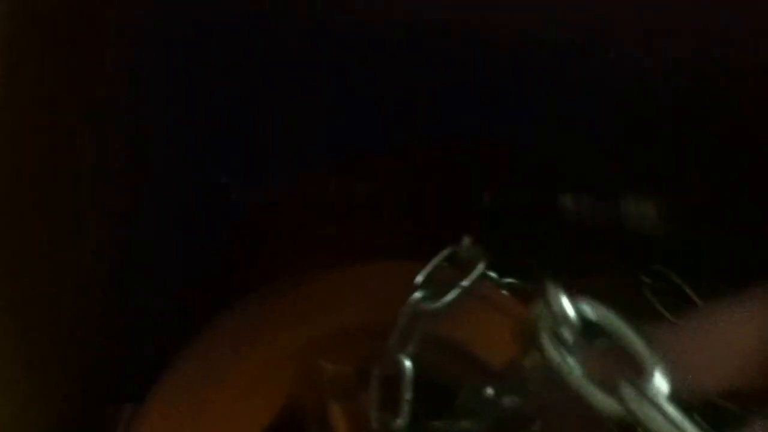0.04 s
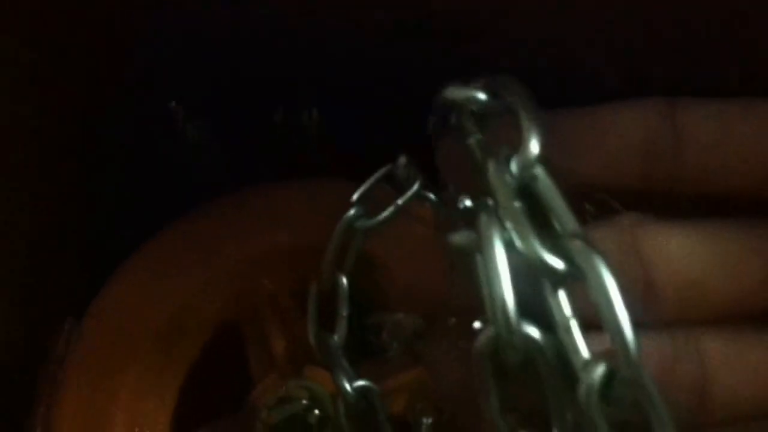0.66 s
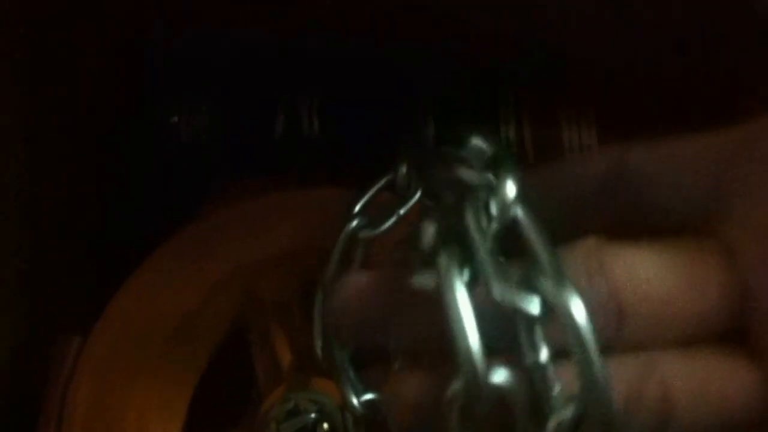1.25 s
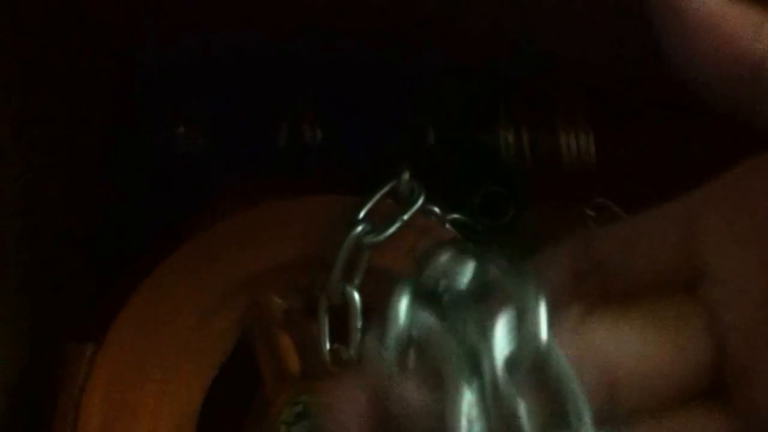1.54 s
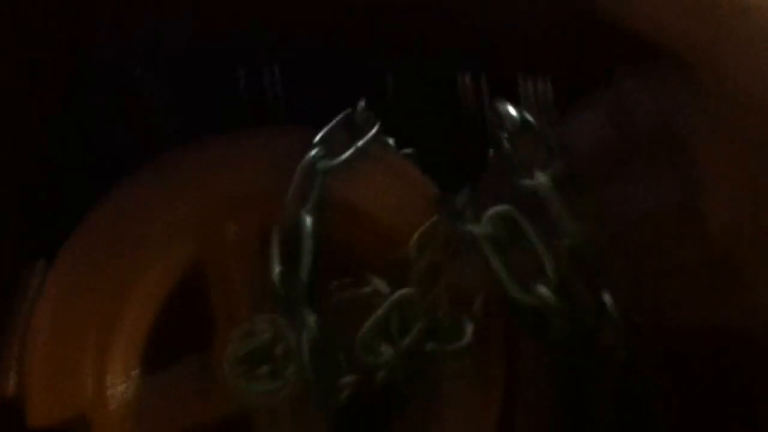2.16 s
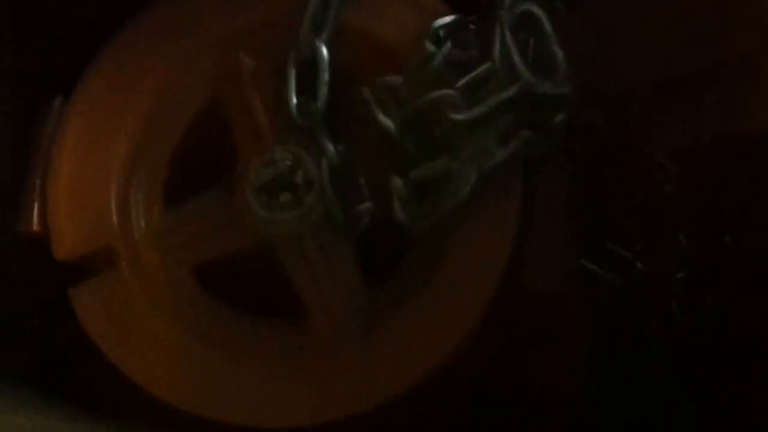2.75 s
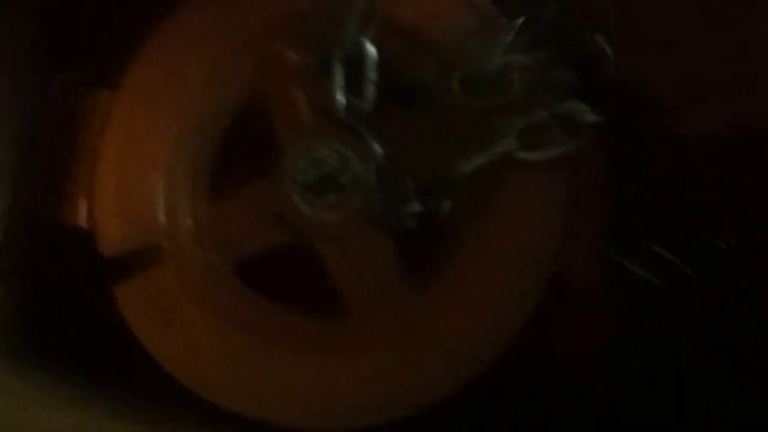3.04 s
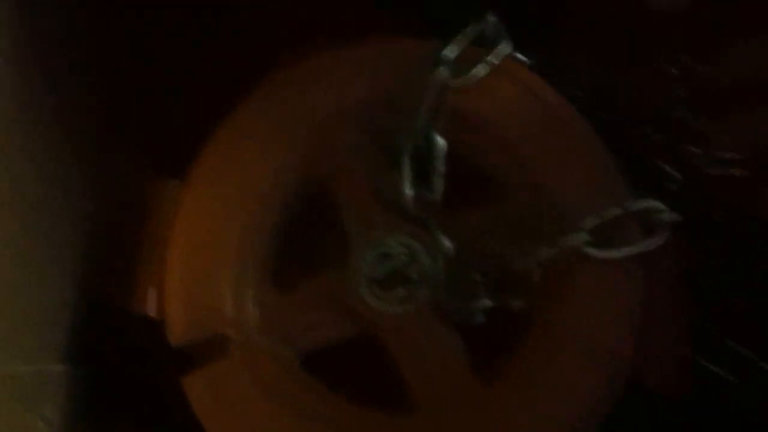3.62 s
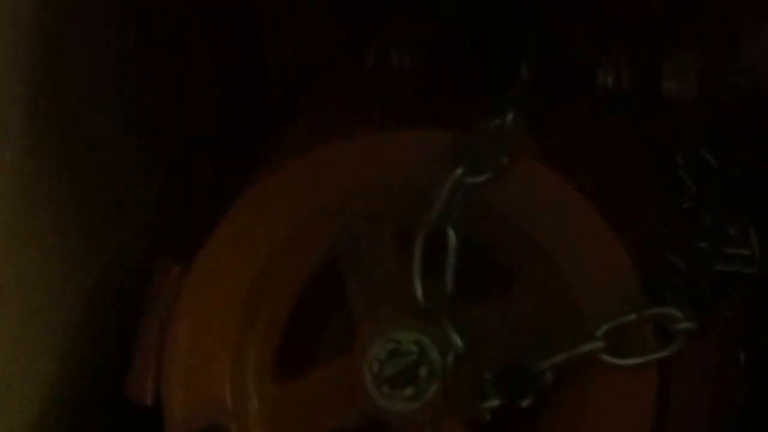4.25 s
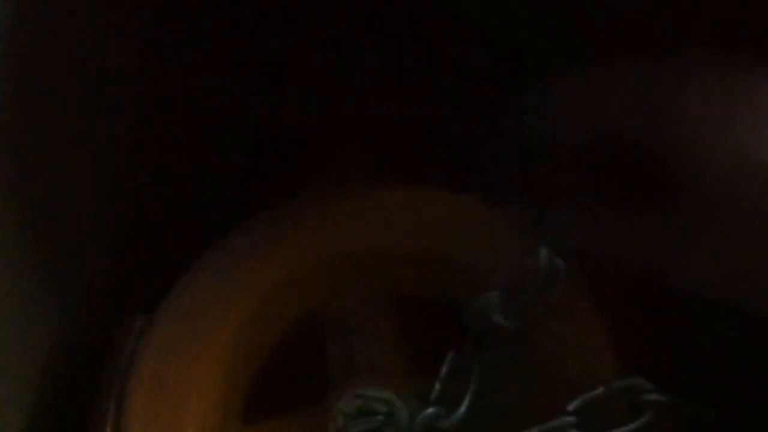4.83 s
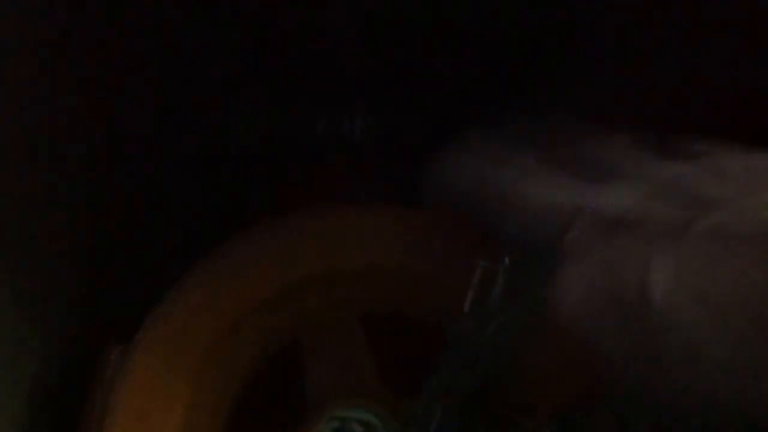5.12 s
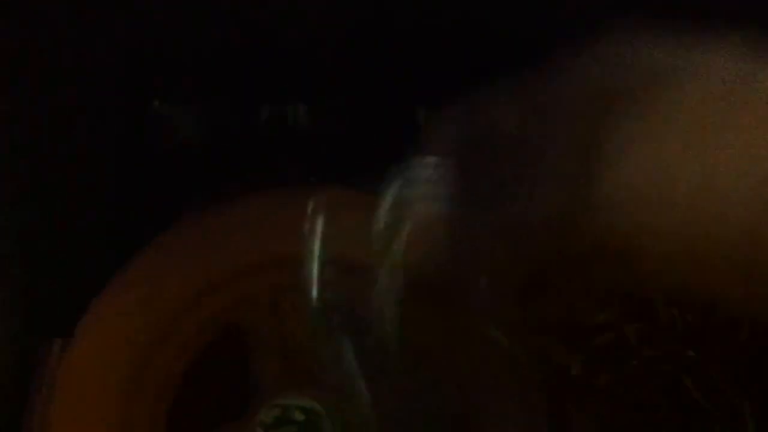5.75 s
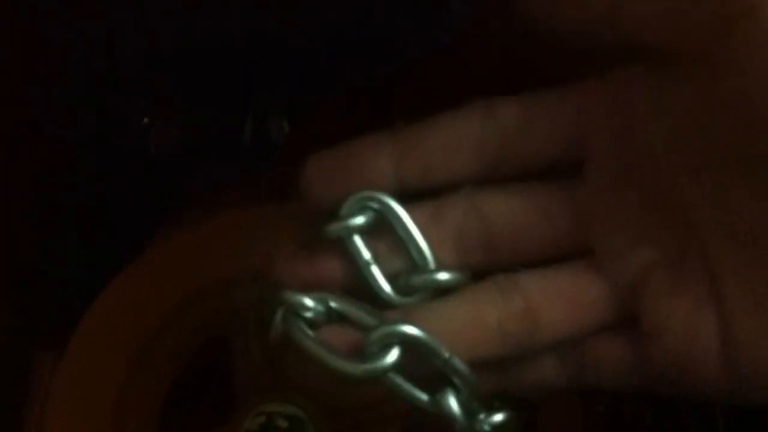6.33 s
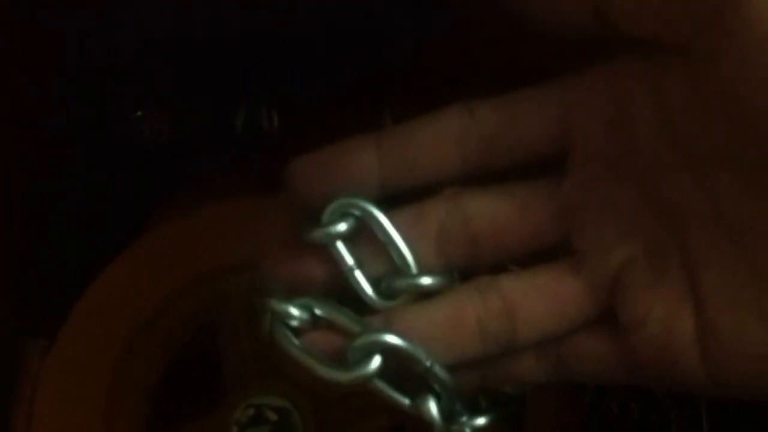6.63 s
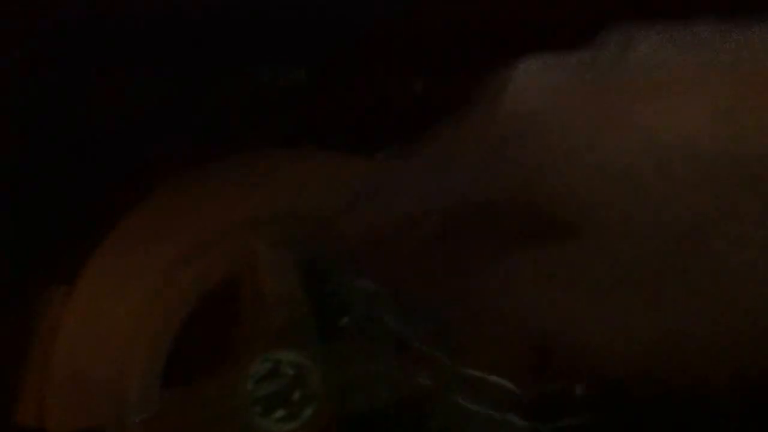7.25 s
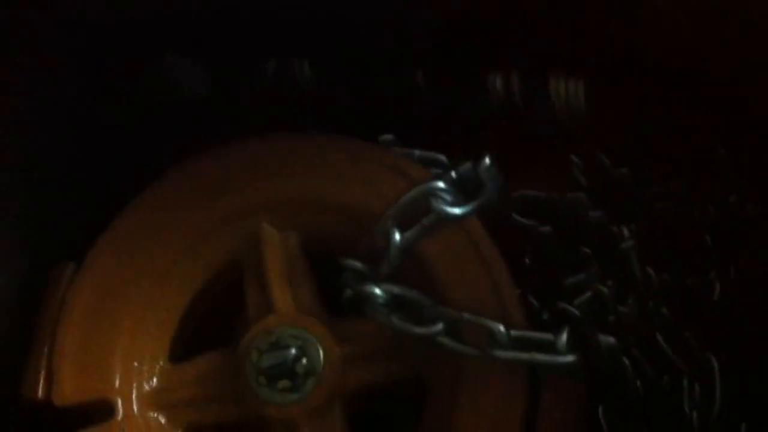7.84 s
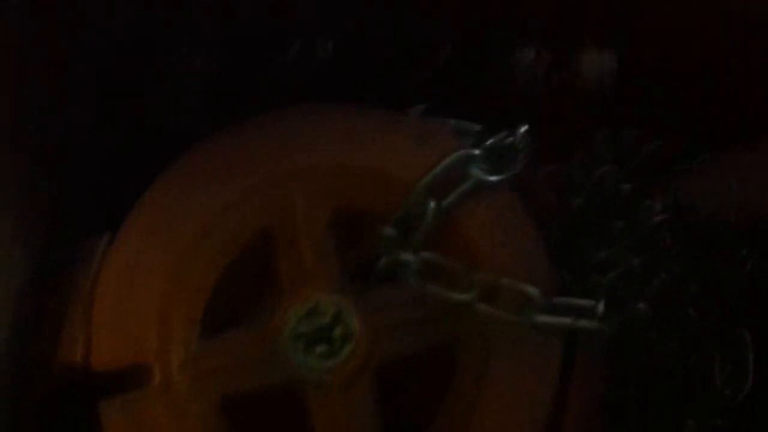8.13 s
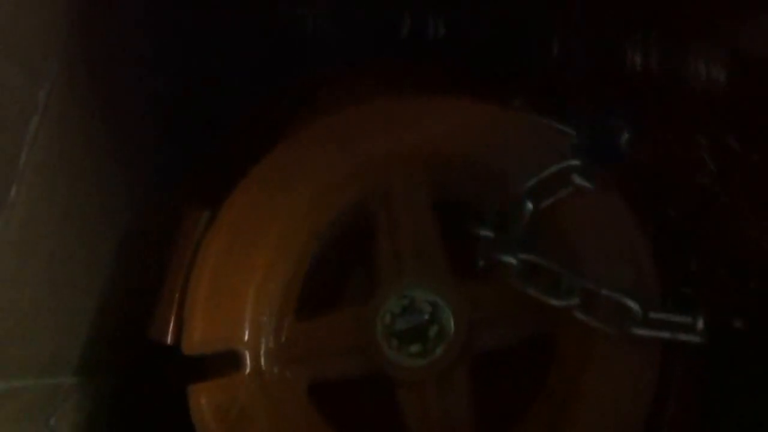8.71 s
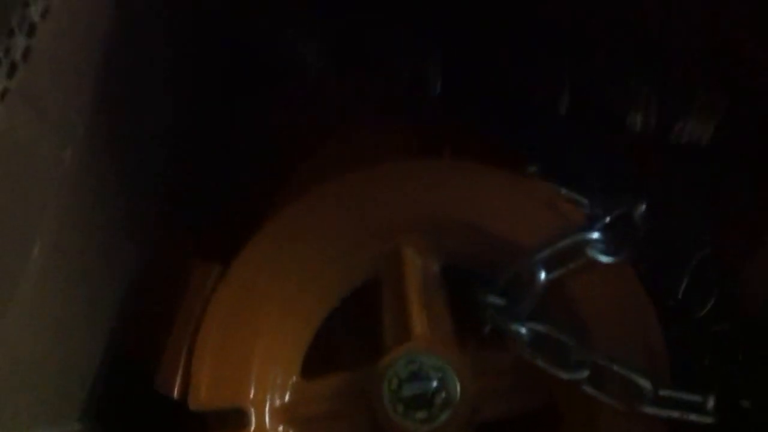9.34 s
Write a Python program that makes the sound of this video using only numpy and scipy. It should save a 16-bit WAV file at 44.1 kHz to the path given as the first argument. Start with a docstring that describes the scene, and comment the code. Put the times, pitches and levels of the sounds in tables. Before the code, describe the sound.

Metal chain links are lifted and dropped on a wheel, jingling, rattling and ticking over a quiet, low indoor hum.

```python
"""A steel chain is lifted by hand and let fall against a chain wheel, close by in a small, humming room.
Hanging links ring freely; links lying on the hand or the wheel only clack. Between the blows
the chain scrapes over the rim in tiny slips and snags with dry ticks, the wheel thumps
on its axle and a sleeve brushes past."""
import sys
import numpy as np
from scipy import signal
from scipy.fft import rfft, irfft, next_fast_len
from scipy.io import wavfile
from scipy.ndimage import uniform_filter1d

SR = 44100
rng = np.random.default_rng(int(sys.argv[2]) if len(sys.argv) > 2 else 0)


def master_out(mix):
    """Clip the mix to full scale and print it as 16-bit PCM to the path in sys.argv[1]."""
    frames = np.transpose(np.atleast_2d(mix))
    ceiling = np.clip(frames, -1, 1)
    pcm = np.round(ceiling * 32767).astype(np.int16)
    wavfile.write(sys.argv[1], SR, pcm)


N = 413658

# Levels in the tables are relative: the functions add an overall level on top.
# The room's background over time. Each row: time in seconds, hum level in dB, air level in dB.
ROOM_LEVELS = [(0.0, -46.5, -51), (0.75, -49.5, -53), (1.41, -47, -52.5), (1.85, -45.5, -49),
               (2.56, -46, -51.5), (2.95, -50, -54.5), (3.21, -46, -48), (3.37, -53.5, -60),
               (3.65, -55, -59.5), (4.44, -50.5, -57), (5.54, -51, -53.5), (5.67, -48, -52),
               (6.58, -55, -58), (7.16, -52.5, -53.5), (7.42, -53, -59.5), (7.92, -57.5, -60),
               (9.38, -50, -53)]
# The tone of the hum and of the moving air. Each row: frequency in Hz, level in dB.
HUM_SPECTRUM = [(25, -27), (50, -22), (70, -7), (98, -10), (125, 1), (150, 3), (190, 4), (255, -4.5),
                (310, 3), (450, -8), (700, -47)]
AIR_SPECTRUM = [(250, -23), (450, 3), (650, 1), (870, 2.5), (1100, 0.5), (2000, -4), (3000, -8),
                (4500, -20.5), (8000, -21.5), (15000, -40.5)]
# The modes (natural tones) of the room, hanging links, lying links and the wheel.
# Each row: frequency in Hz, level in dB, seconds to fade by 60 dB (called t60 below).
ROOM_MODES = [(133.8, 1, 0.49), (214.2, -2, 0.39), (303.7, -10, 0.72), (443, -10, 0.11), (857, 0.5, 0.12),
              (1170, -17, 0.094)]
HANGING_MODES = [(1580, -8, .07), (2165, -5, .09), (3288, -5, .17), (4755, -5, .26), (5012, -7, .18),
                 (5168, -8, .17), (5422, -2, .22), (5615, -6, .16), (5745, -8, .18), (5862, -7, .25),
                 (6430, -8, .24), (6628, -7, .26), (7064, -3, .32), (7890, -8, .16), (8086, 2, .23),
                 (8345, -2, .17), (8480, 0, .24), (8560, -4, .17), (8900, -10, .1), (9287, -11, .2),
                 (9540, -7, .24), (9917, -17, .24), (10695, -8, .26), (11100, -11, .16), (11897, -2, .24),
                 (12763, -4, .23), (13420, -7, .18), (13740, -4, .22), (14100, -6, .17), (14950, -10, .12)]
LYING_MODES = [(1515, -7, .12), (1580, -12, .1), (2022, -2, .1), (2075, -4, .1), (2157, -5, .14),
               (2700, -9, .09), (2830, -13, .08), (3285, -13, .16), (4500, -19, .12), (4690, -13, .12),
               (5150, -16, .08), (5425, -6, .12), (5498, 0, .19), (5742, -3, .17), (6440, -13, .12),
               (7090, -17, .12), (7700, -7, .07), (7900, 1, .15), (8100, -1, .18), (8358, -3, .11),
               (8650, -14, .08), (9090, -15, .1), (9580, -22, .12), (10370, -9, .11), (10900, -15, .1),
               (12200, -20, .1), (12800, -19, .12), (13440, -18, .1), (14100, -13, .11), (15100, -15, .08)]
WHEEL_MODES = [(132.8, -28, 0.25), (190, -2, 0.44), (222, -4, 0.44), (246.5, -26, 0.051), (331, -8, 0.22),
               (388, 1.5, 0.15), (440.7, 5.5, 0.055), (560, 1, 0.067)]
# Blows of hanging links, then of lying links. Each row: start in seconds, level in dB, then the
# body, middle and top bands in dB from that level, and the lasting ring in dB from the first ring.
CLINKS = [(0.029, -16, -27, -10, -30, -23.5), (0.064, -35, -14, -16, -26, -24),
          (0.504, -29.5, -18, -11, -27, -26), (3.052, -15, -32, -9.5, -30.5, -21.5),
          (3.075, -17, -20, -10.5, -27.5, -20), (3.096, -14.5, -28, -13.5, -23, -29),
          (3.149, -13.5, -18, -13, -20.5, -20.5), (3.172, -8, -22, -13.5, -25.5, -19.5),
          (3.217, -13.5, -23, -12, -22, -18), (4.589, -32.5, -23, -10, -20, -17),
          (4.61, -31, -21, -7.5, -30, -20), (4.625, -36.5, -29, -8, -32, -22),
          (4.712, -19.5, -21.5, -14, -23, -27), (4.775, -28, -20, -9, -17, -22),
          (4.801, -34.5, -11, -7, -37, -22), (4.975, -33, -23, -7, -19, -20),
          (5.001, -25, -18, -6, -20, -17), (5.025, -16.5, -24, -9.5, -18, -18),
          (5.051, -10, -27.5, -14.5, -13, -18), (5.156, -39, -11.5, -17, -19, -20),
          (5.375, -35, -13, -12, -16, -20), (5.533, -15, -11, -10, -28, -21.5),
          (5.779, -13, -24, -17.5, -12.5, -20), (5.821, -7, -21.5, -13, -17, -16),
          (5.837, -5.5, -21, -8, -26.5, -18.5), (5.962, -24, -20, -13, -15, -20),
          (5.991, -20, -24.5, -11, -12.5, -19), (7.046, -18.5, -21.5, -10.5, -21, -20),
          (7.074, -22.5, -13, -9.5, -19.5, -20.5), (7.102, -23, -16, -11, -13, -21),
          (7.161, -5.5, -26, -10, -23, -18), (7.172, -5, -17.5, -19, -20, -27),
          (7.199, -3.5, -27, -22, -15, -21), (7.259, -7.5, -22.5, -12, -13, -18),
          (7.281, -14, -18.5, -13.5, -13, -22), (7.334, -18, -27.5, -24, -11.5, -20),
          (7.397, -31.5, -12, -13, -23, -22), (8.435, -15, -24, -18, -15.5, -27),
          (8.483, -24, -17.5, -8.5, -24, -15), (8.495, -27.5, -19, -7, -17, -20),
          (8.62, -26.5, -34, -11.5, -23, -23), (9.223, -31, -8, -8, -19, -21),
          (9.242, -25.5, -33, -17, -9, -24), (9.291, -24.5, -18, -10, -17, -26)]
CLACKS = [(0.335, -30.5, -8, -8.5, -36, -8), (1.472, -36, -7.5, -16.5, -37, -21),
          (1.598, -26.5, -7, -20, -35, -35), (1.706, -9, -10, -11, -34, -35),
          (1.734, -20, -11, -14, -15, -7), (1.787, -10, -12, -14.5, -33, -5),
          (1.811, -17.5, -7, -8.5, -10, -19), (1.828, -4, -10.5, -14.5, -21, -21),
          (1.961, -17.5, -18, -11, -16, -24), (2.03, -19.5, -9.5, -10.5, -28, -7),
          (2.115, -22.5, -12.5, -12.5, -22, -17), (2.159, -20.5, -18, -17, -22, -14),
          (2.173, -15.5, -9.5, -14.5, -21, -33), (2.208, -19, -4.5, -19, -16, -10),
          (2.268, -30.5, -7, -6.5, -20, -22), (2.307, -13.5, -7.5, -12, -34, -10),
          (2.616, -23.5, -16.5, -15, -15, -7), (2.73, -19, -11.5, -10.5, -20, -13.5),
          (2.753, -12.5, -15, -9.5, -21.5, -3), (2.767, -1.5, -15, -23, -29.5, -11),
          (2.771, -7.5, -20, -9, -22, -7.5), (2.795, -5.5, -18, -11.5, -23, -5),
          (2.808, -14, -17, -9, -24, 0), (2.82, -9, -11, -17, -20.5, -9),
          (2.915, -17.5, -20.5, -16, -17.5, -20), (2.99, -12.5, -9, -11, -20.5, -21),
          (3.01, -15, -16, -12, -20, -18), (3.129, -16.5, -14, -9.5, -32, -22.5),
          (5.229, -25, -7.5, -20, -31, -7), (5.259, -20.5, -14, -15.5, -15.5, -38),
          (5.497, -30, 0, -7, -31, -4), (5.582, -21, -14.5, -8.5, -17.5, -12),
          (5.616, -22, -9, -14, -19.5, -16), (5.722, -26, -2.5, -33, -27, -16),
          (5.862, -20, -6.5, -22, -19.5, -10), (6.096, -15.5, -7.5, -15, -34, -13),
          (6.125, -28, -2.5, -30, -26, -25), (6.896, -25, -3.5, -14, -34, -15),
          (6.952, -12.5, -7, -18.5, -40, -30)]
# Borders in Hz of a link's five bands: knock, body, middle, bright and top.
LINK_EDGES_HZ = [280, 1100, 2900, 7000, 10000, 17000]
# Drags of the chain over the rim. Each row: fastest moment in seconds, seconds of speeding up,
# seconds of slowing down, then the levels of grating, jingle and hiss in dB.
DRAGS = [(1.86, 0.31, 0.31, -36.5, -45, -40), (2.18, 0.097, 0.38, -46.5, -61, -49.5),
         (2.62, .04, .14, -48, -54, -58.5), (2.79, 0.19, 0.15, -39, -34, -44),
         (3.05, 0.23, .15, -41, -44, -46), (3.34, .34, 0.086, -35.5, -33.5, -39),
         (4.63, 0.074, 0.53, -65, -54, -59), (5.06, 0.24, 0.25, -66, -45.5, -55),
         (5.57, 0.15, 0.081, -41.5, -38.5, -40), (5.83, .14, 0.14, -36.5, -33, -36.5),
         (6.07, 0.14, 0.15, -51, -39, -41.5), (7.19, 0.11, 0.063, -38.5, -50, -65),
         (7.3, 0.33, 0.19, -53, -32, -44), (8.901, 0.21, 0.43, -50.5, -57, -57),
         (9.36, 0.35, 0.084, -45, -56, -58)]
# The tone of a drag's grating and of its hiss. Each row: frequency in Hz, level in dB.
GRATE_SPECTRUM = [(80, -41.5), (400, -11.5), (900, -12), (1300, -1), (1550, 2.5), (1800, -1.5), (2100, 3.5),
                  (2450, -8.5), (2800, 0), (3300, -7.5), (4000, -11.5), (5500, -28.5)]
HISS_SPECTRUM = [(500, -44.5), (2500, -22), (4200, -15), (5000, -5.5), (5600, 6), (6200, 5.5), (7200, 7.5),
                 (8200, -1), (9700, 0), (12000, -5), (15500, -1.5)]
# Knocks of the wheel. Each row: start in seconds, level in dB, upper band in dB from that level.
THUMPS = [(1.728, -22, -12.5), (1.791, -23, -10), (2.157, -23.5, -12.5), (2.194, -22, -3.5),
          (2.274, -30.5, -17), (2.393, -30.5, -17), (2.445, -23, -4.5), (2.548, -24, -20),
          (2.717, -14.5, -12), (4.772, -36.5, -9), (5.526, -37, -4.5), (5.762, -33, -11), (6.17, -33, -11),
          (7.163, -37.5, -6), (8.437, -34.5, -9.5), (9.175, -23.5, -18)]
# Borders in Hz of the wheel's low and upper bands.
WHEEL_EDGES_HZ = [150, 290, 580]
# Links catching and slipping. Each row: start in seconds, level in dB.
SNAGS = [(1.853, -16), (1.898, -23), (2.005, -28), (2.397, -30), (2.49, -25.5), (2.589, -25.5),
         (3.298, -15.5), (3.359, -15), (3.498, -35), (5.673, -22), (6.218, -28.5), (6.88, -33.5),
         (8.855, -28.5), (8.987, -29.5), (9.041, -23), (9.073, -24), (9.205, -27), (9.303, -36),
         (9.326, -28), (9.354, -24), (9.37, -29)]
# Strokes of the sleeve. Each row: start in seconds, end in seconds, level in dB.
SLEEVE_STROKES = [(3.38, 3.555, -67), (3.638, 3.97, -68), (4.09, 4.26, -62.5), (4.267, 4.43, -60),
                  (7.362, 7.832, -61.5), (7.88, 8.018, -64.5), (8.062, 8.394, -48.5), (8.495, 8.84, -72)]
# The tone of brushing cloth. Each row: frequency in Hz, level in dB.
CLOTH_SPECTRUM = [(530, -38), (900, -10), (1410, 3.5), (1600, 2), (2120, 3), (3340, -8), (6110, 3.5),
                  (12600, -2.5), (14700, -2), (16000, -10)]


def undb(db):
    """Turn decibels into a number to multiply by."""
    return 10 ** (np.asarray(db) / 20)


def unit(x):
    """Scale a sound to an average power of 1."""
    return x / np.sqrt(np.mean(x ** 2))


def fade(t, t60):
    """Die away smoothly, 60 dB down after t60 seconds."""
    return np.exp(-np.log(1000) * t / t60)


def colour(x, spectrum):
    """Give a sound the tone of a spectrum table, at a power of 1."""
    hz, db = np.transpose(spectrum)
    size = next_fast_len(N)
    bins_hz = np.maximum(np.arange(size // 2 + 1) * SR / size, 1)
    gain = undb(np.interp(np.log(bins_hz), np.log(hz), db))
    return unit(irfft(rfft(x, size) * gain, size)[:N])


def wander(per_s):
    """A curve that drifts between random values, mostly within -1 to 1."""
    values = rng.standard_normal(2000)
    return np.interp(np.arange(N) / SR * per_s, np.arange(len(values)), values)


def place(times, sounds):
    """Add each sound to the time line at its start time."""
    out = np.zeros(N + sounds.shape[1])
    for start, sound in zip(times, sounds):
        i = max(int(start * SR), 0)
        out[i:i + len(sound)] += sound
    return out[:N]


def ring(modes, t, count, scatter_db, detune_hz=0):
    """One ring per blow: each lands on another spot and so mixes the modes anew."""
    hz, db, t60 = np.transpose(modes)[:, :, None]
    waves = undb(db) * fade(t, t60) * np.exp(2j * np.pi * hz * t)
    level, phase = rng.standard_normal((count, 2, len(hz))).transpose(1, 0, 2)
    mix = undb(scatter_db * level) * np.exp(2j * np.pi * phase)
    # no two links are quite the same size
    detune = np.exp(2j * np.pi * detune_hz * rng.standard_normal((count, 1)) * t)
    return (mix @ waves * detune).imag / np.linalg.norm(undb(db))


def set_bands(sounds, edges_hz, band_db, attack_s):
    """Set how strong each blow is in each frequency band over its first moments."""
    out = 0
    for low, high, db in zip(edges_hz, edges_hz[1:], band_db):
        band = signal.sosfilt(signal.butter(3, [low, high], "bandpass", fs=SR, output="sos"), sounds)
        power = np.mean(band[:, :int(attack_s * SR)] ** 2, axis=1)
        out = out + band * (undb(db) / np.sqrt(power))[:, None]
    return out


def room_tone(air_db, waver_db, modes_db, hiss_db):
    """A low, wavering hum keeps the room's modes sounding, over moving air and a faint hiss."""
    room_ring = ring(ROOM_MODES, np.arange(SR // 2) / SR, count=1, scatter_db=-0.5)[0]
    resonance = unit(signal.fftconvolve(rng.standard_normal(N + SR), room_ring)[SR:SR + N])
    hum = colour(rng.standard_normal(N), HUM_SPECTRUM) + undb(modes_db) * resonance
    hum *= undb(waver_db * wander(per_s=8.3))
    air = colour(rng.standard_normal(N), AIR_SPECTRUM) * undb(air_db)
    times, *levels_db = np.transpose(ROOM_LEVELS)
    hum_gain, air_gain = (undb(np.interp(np.arange(N) / SR, times, db)) for db in levels_db)
    return hum * hum_gain + air * air_gain + undb(hiss_db) * rng.standard_normal(N)


def blow_bands(body_db, middle_db, top_db):
    """A blow's five band levels: energy not spent on body and middle goes to the bright band."""
    whole_db = -5.5  # a band this strong holds all of the blow's energy
    spare = 1 - undb(body_db - whole_db) ** 2 - undb(middle_db - whole_db) ** 2
    bright_db = -8.5 + 10 * np.log10(np.maximum(spare, 0.03))
    knock_db = body_db - 14.5  # the rim knocks dully under each blow
    return np.array([knock_db, body_db, middle_db, bright_db, top_db])


def link_blows(blows, modes, choke_t60, crack_db, crack_t60, bounces_per_s, bounce_db, bounce_t60,
               scatter_db, rise_s, level_db):
    """Steel hits steel: a crack, a ring that the neighbouring links soon choke, and a lasting ring."""
    starts, blow_db, body_db, middle_db, top_db, ring_db = np.transpose(blows)
    t = np.arange(SR // 4) / SR
    tone = ring(modes, t, len(starts), scatter_db, detune_hz=14)
    tone *= fade(t, choke_t60) + undb(ring_db)[:, None]
    crack = undb(crack_db) * fade(t, crack_t60) * rng.standard_normal(tone.shape)
    # after the first contact the links bounce on each other, ever more weakly
    early = t[:SR // 8]
    shape = (len(starts), len(early))
    bounces = (rng.random(shape) < bounces_per_s / SR) * rng.uniform(-0.87, 1, shape)
    contacts = bounces * undb(bounce_db) * fade(early, bounce_t60)
    contacts[:, 0] = 1
    onset = 1 - np.exp(-(t / rise_s) ** 2)
    sounds = signal.fftconvolve(tone + crack, contacts, axes=1)[:, :len(t)] * onset
    band_db = blow_db + blow_bands(body_db, middle_db, top_db)
    sounds = set_bands(sounds, LINK_EDGES_HZ, band_db, attack_s=0.005)
    # a faint copy a few milliseconds early softens each blow's attack
    soft_lead_in = undb(-19) * place(starts - rng.uniform(0.0018, 0.008, len(starts)), sounds)
    return undb(level_db) * (soft_lead_in + place(starts - rise_s / 2, sounds))


def hanging_clinks():
    """Hanging links are free to ring brightly and bounce hard."""
    return link_blows(CLINKS, HANGING_MODES, choke_t60=0.04, crack_db=-3.5, crack_t60=0.022,
                      bounces_per_s=630, bounce_db=-2, bounce_t60=0.075,
                      scatter_db=8, rise_s=0.0018, level_db=-2.5)


def lying_clacks():
    """Links lying on the hand or the wheel are muffled, so they clack."""
    return link_blows(CLACKS, LYING_MODES, choke_t60=0.042, crack_db=-6, crack_t60=0.036,
                      bounces_per_s=940, bounce_db=-12.5, bounce_t60=0.08,
                      scatter_db=2.5, rise_s=0.0018, level_db=-4)


def slips(per_s, spread_db, t60):
    """Tiny slips of uneven size come at random, each a short rasp of noise."""
    t = np.arange(SR // 5) / SR
    slipping = rng.random(N) < per_s / SR
    sizes = slipping * undb(spread_db * np.minimum(rng.exponential(size=N), 3))
    power = np.abs(signal.fftconvolve(sizes ** 2, fade(t, t60) ** 2)[:N])
    return rng.standard_normal(N) * np.sqrt(power)


def drag_gains(range_db, breakaway_s):
    """Grating, jingle and hiss swell as the chain breaks loose and speeds up, and die as it slows."""
    t = np.arange(N) / SR
    gains = np.zeros((3, N))
    for fastest_s, rise_s, fall_s, *levels_db in DRAGS:
        slowness = np.maximum((fastest_s - t) / rise_s, (t - fastest_s) / fall_s)
        swell = undb(-range_db * slowness ** 1.37)  # a power above 1 rounds the crest
        loose = np.clip(1 + (t - fastest_s + rise_s) / breakaway_s, 0, 1)
        gains = np.maximum(gains, undb(levels_db)[:, None] * loose * swell)
    return gains


def loose_links(count, taps_per_s, spread_db, choke_t60):
    """A few loose links tap their neighbours at random, each with its own mix of modes."""
    t = np.arange(SR // 5) / SR
    rings = ring(HANGING_MODES, t, count, scatter_db=11, detune_hz=25) * fade(t, choke_t60)
    jingle = np.zeros(N)
    for link in rings:
        taps = slips(taps_per_s, spread_db, t60=0.005)
        jingle += signal.fftconvolve(taps, link)[:N]
    return unit(jingle)


def chain_drags(grate_db, hiss_db, jingle_db, patchy_db):
    """Links dragged over the rim grate and hiss, while the loose ones behind them jingle."""
    grate_gain, jingle_gain, hiss_gain = drag_gains(range_db=23.5, breakaway_s=0.04)
    rasp = slips(per_s=520, spread_db=5, t60=0.019)
    grate = colour(rasp, GRATE_SPECTRUM) * grate_gain
    hiss = colour(rasp, HISS_SPECTRUM) * hiss_gain * undb(patchy_db * wander(per_s=60))
    jingle = loose_links(count=3, taps_per_s=44, spread_db=3.5, choke_t60=0.044) * jingle_gain
    return undb(grate_db) * grate + undb(hiss_db) * hiss + undb(jingle_db) * jingle


def wheel_thumps(rattle_db, rattle_t60, rise_s, choke_t60, level_db):
    """Tugs on the chain knock the wheel against its axle: a short rattle and a low ring."""
    starts, thump_db, upper_db = np.transpose(THUMPS)
    t = np.arange(SR // 3) / SR
    tone = ring(WHEEL_MODES, t, len(starts), scatter_db=0) * fade(t, choke_t60)
    rattle = undb(rattle_db) * fade(t, rattle_t60) * rng.standard_normal(tone.shape)
    sounds = (tone + rattle) * (1 - np.exp(-t / rise_s))
    band_db = [thump_db - 8.5, thump_db + upper_db]  # low band, upper band
    return undb(level_db) * place(starts, set_bands(sounds, WHEEL_EDGES_HZ, band_db, attack_s=0.01))


def snag_ticks(body_db, middle_db, top_db, ring_db):
    """Links catch and slip with a dry, almost toneless tick."""
    ticks = [(start, db, body_db, middle_db, top_db, ring_db) for start, db in SNAGS]
    return link_blows(ticks, LYING_MODES, choke_t60=0.006, crack_db=9.5, crack_t60=0.027,
                      bounces_per_s=680, bounce_db=-10, bounce_t60=0.051,
                      scatter_db=11, rise_s=0.0011, level_db=-6)


def sleeve(level_db, flicker_db):
    """Cloth brushes by with a fine, uneven hiss that swells and eases with each stroke of the arm."""
    t = np.arange(N) / SR
    strokes = np.zeros(N)
    for start, end, db in SLEEVE_STROKES:
        along = (t - start) / (end - start)
        arch_db = np.interp(along, [0, 0.69, 1], [-12, 0, -11])  # loudest where the arm is fastest
        strokes += undb(db + arch_db) * (along > 0) * (along < 1)
    cloth = colour(rng.standard_normal(N), CLOTH_SPECTRUM)
    return cloth * uniform_filter1d(strokes, size=300) * undb(level_db + flicker_db * wander(per_s=90))


def walls(x, t60, echo_db):
    """The walls of a small room add a short, dense echo."""
    t = np.arange(SR // 2) / SR
    echo = rng.standard_normal(len(t)) * fade(t, t60) * (1 - np.exp(-t / 0.006))
    return x + undb(echo_db) * signal.fftconvolve(x, echo / np.linalg.norm(echo))[:N]


def scene():
    """Mix chain, wheel and sleeve with the humming room, in one channel."""
    near = lying_clacks() + hanging_clinks()
    near += wheel_thumps(rattle_db=17, rattle_t60=0.046, rise_s=0.00036, choke_t60=0.81, level_db=-3)
    near += chain_drags(grate_db=-1, hiss_db=2, jingle_db=-2.5, patchy_db=4.5)
    near += snag_ticks(body_db=-12, middle_db=-15, top_db=-11, ring_db=-20.5)
    near += sleeve(level_db=7, flicker_db=1.9)
    in_room = walls(near, t60=0.27, echo_db=-15)
    background = room_tone(air_db=1.5, waver_db=2.5, modes_db=-7, hiss_db=-70.5)
    return (in_room + background)[None]


def record(dry):
    """A steep filter cuts the treble above 15900 Hz."""
    return signal.sosfilt(signal.ellip(10, 0.2, 75, 15900, fs=SR, output="sos"), dry)


dry = scene()
out = record(dry)
master_out(out)
```